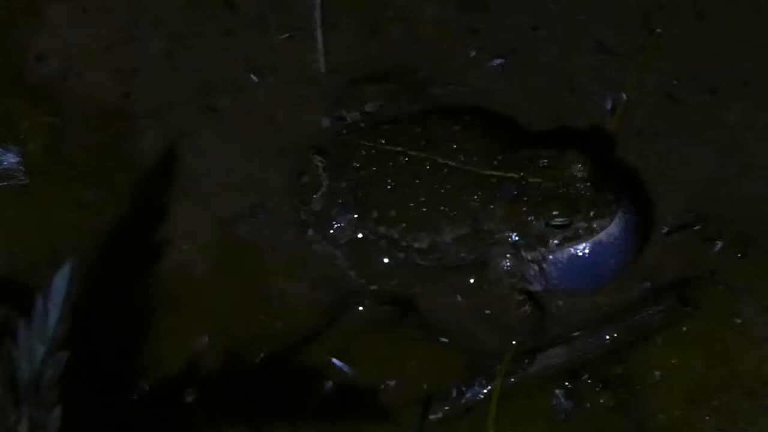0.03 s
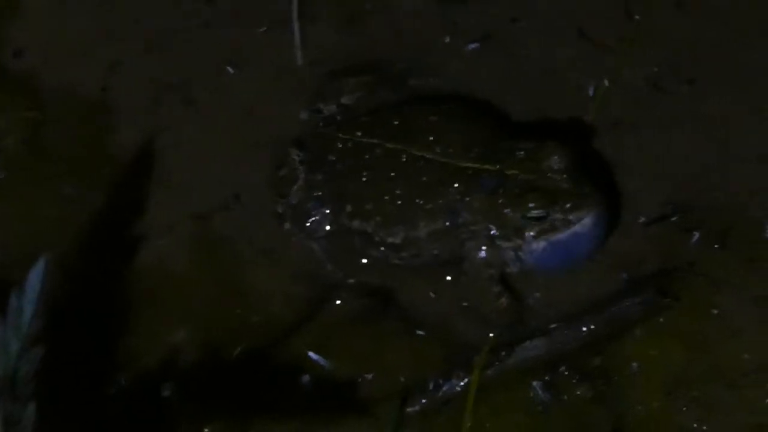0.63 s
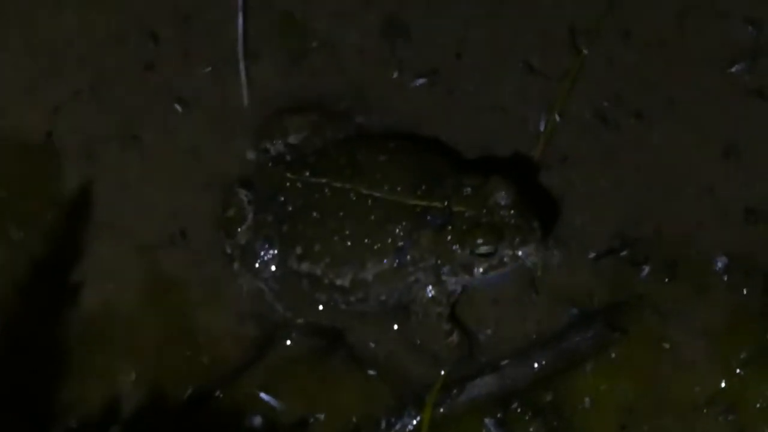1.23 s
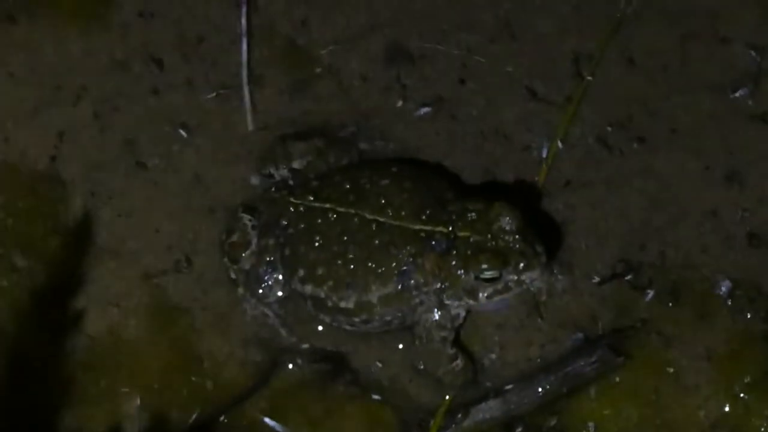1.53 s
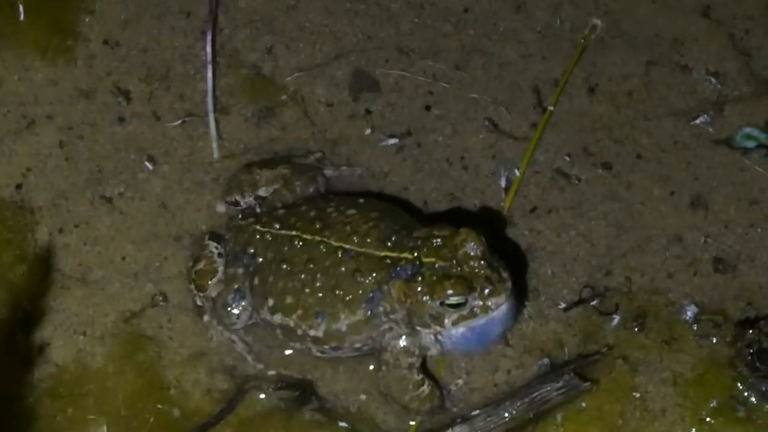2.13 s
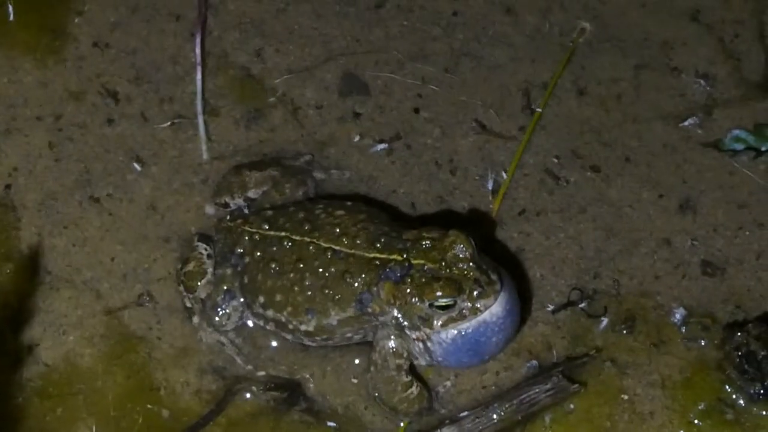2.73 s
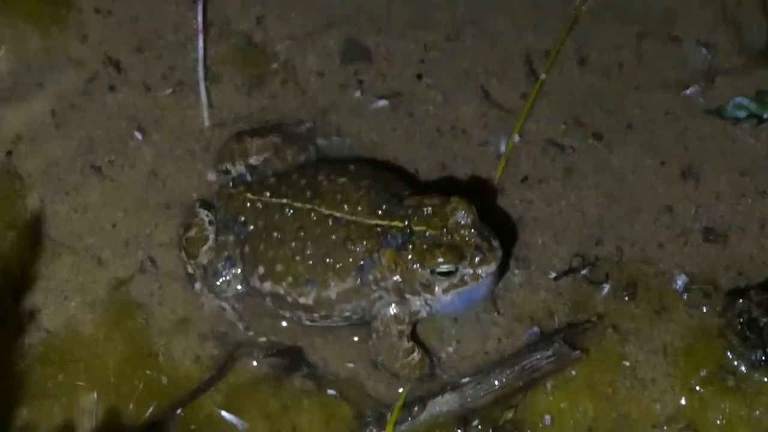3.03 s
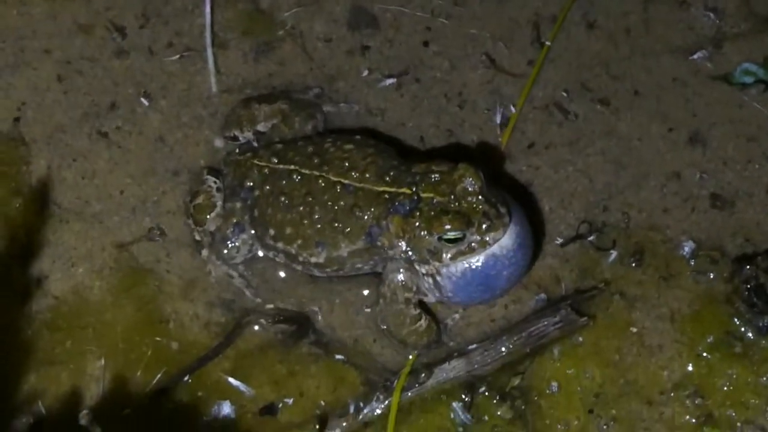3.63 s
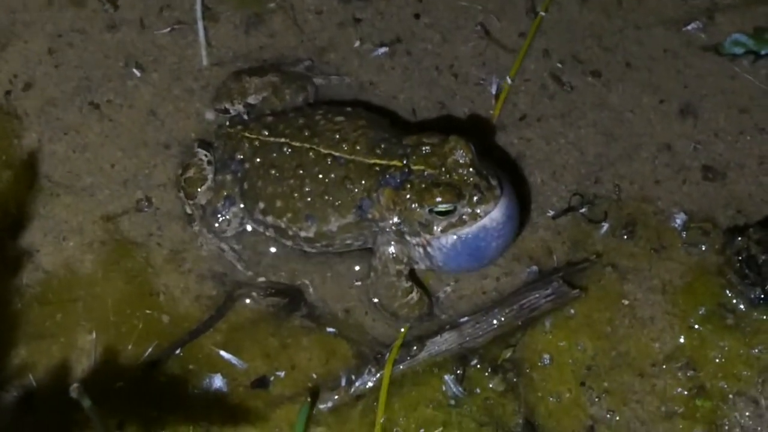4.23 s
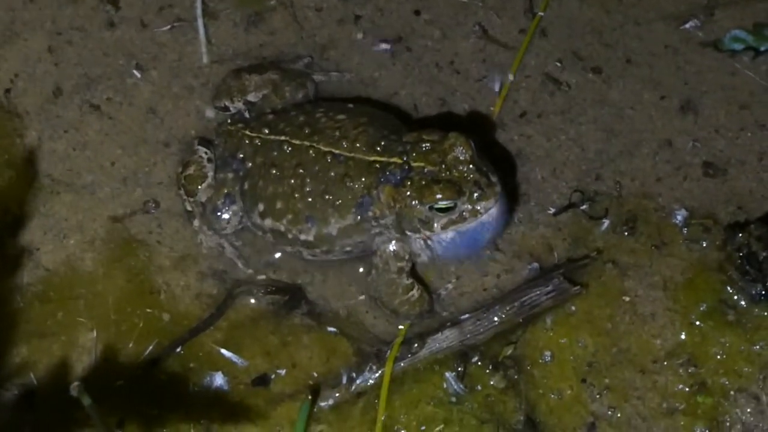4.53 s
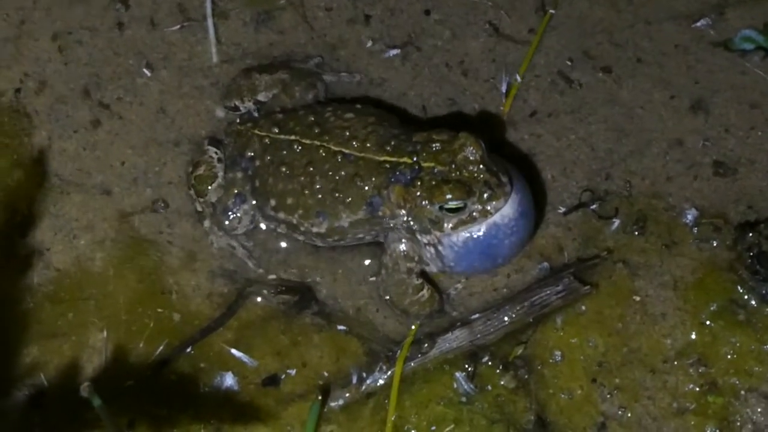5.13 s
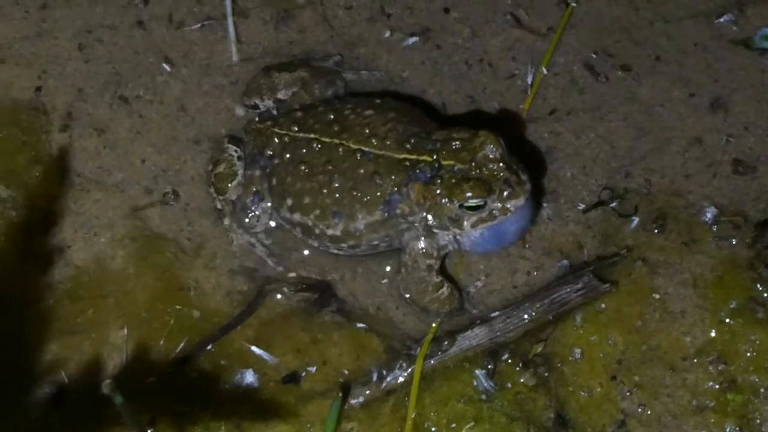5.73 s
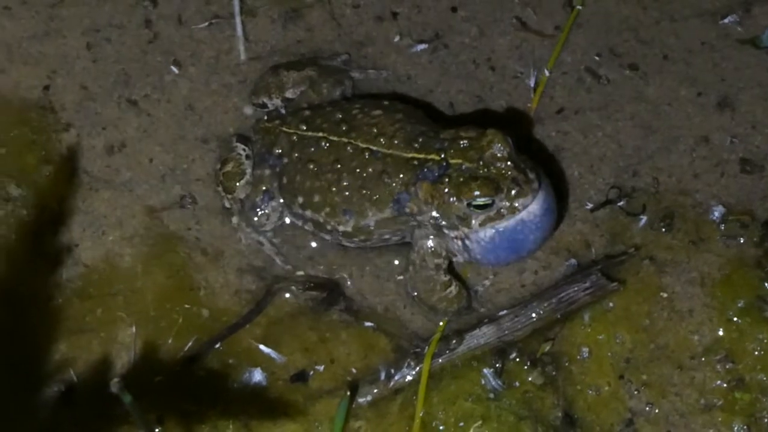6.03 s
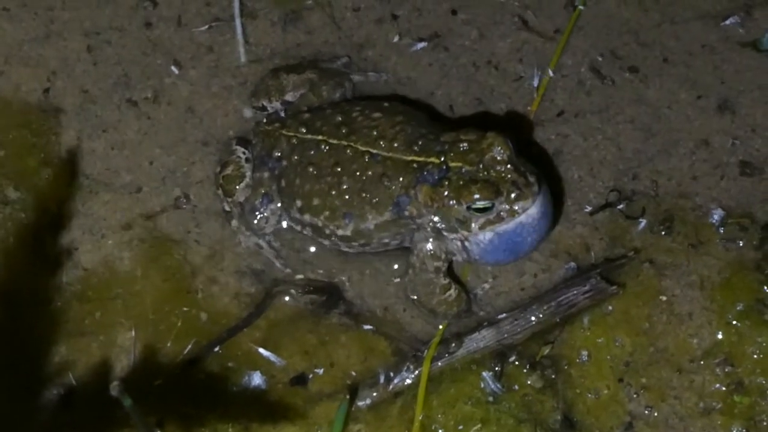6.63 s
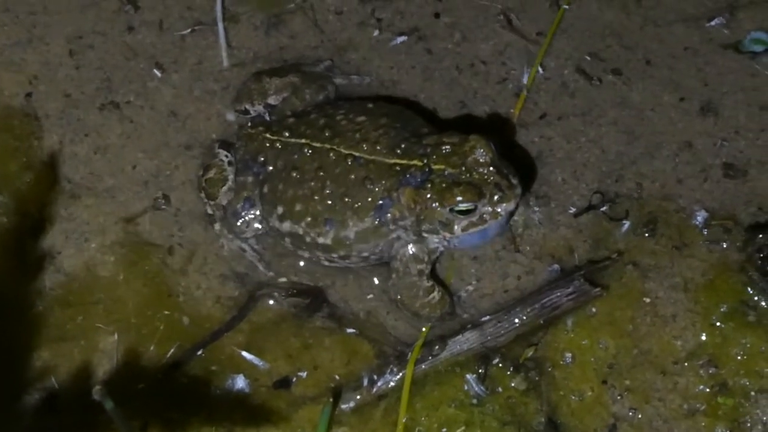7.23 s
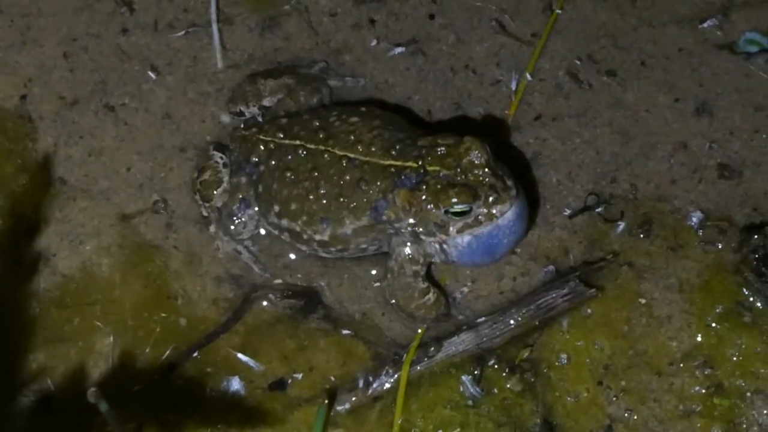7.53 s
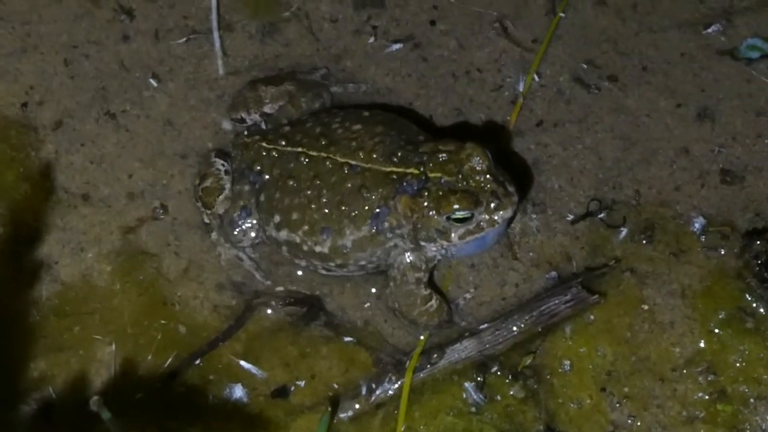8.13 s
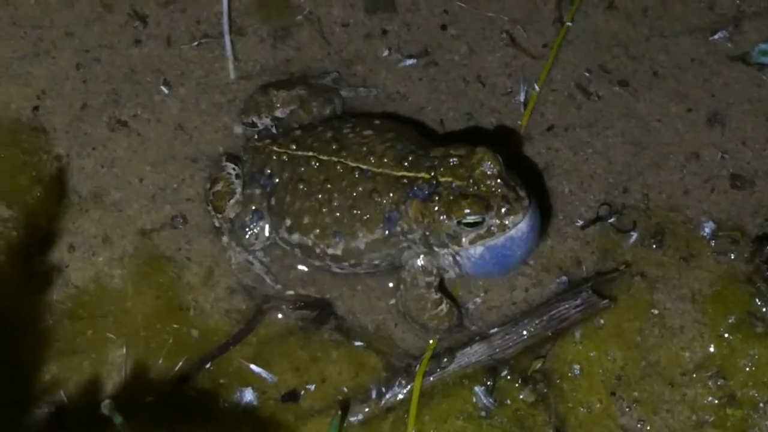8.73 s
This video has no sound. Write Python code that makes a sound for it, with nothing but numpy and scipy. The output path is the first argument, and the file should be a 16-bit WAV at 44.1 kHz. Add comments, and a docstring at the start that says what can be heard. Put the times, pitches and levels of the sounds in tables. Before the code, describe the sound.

Three toads call close to the microphone at the edge of a shallow pool at night. Their loud, rasping trills last about half a second each and follow one another in overlapping turns, each toad at a slightly different pitch. One sometimes ends on a tiny squeak. A fainter chorus of more toads continues farther away, over very soft night air. The calling carries on throughout.

```python
"""Toads at a night pool

Three toads trill in turns at the edge of a shallow pool, with a chorus of others farther off.
A trill is a run of pulses, 30-50 a second; each rings the vocal sac for a few milliseconds.
The middle toad sometimes ends on a squeak. Banks and plants scatter the calls. Behind them:
night air, a low distant hum, a few dry ticks and a small animal's faint chirps."""
import sys
import numpy as np
from scipy import signal
from scipy.fft import rfft, irfft, next_fast_len
from scipy.io import wavfile
from scipy.ndimage import uniform_filter1d, minimum_filter1d

SR = 44100
rng = np.random.default_rng(int(sys.argv[2]) if len(sys.argv) > 2 else 0)


def output_pcm(signal):
    """Save a mono or channel-first signal as 16-bit PCM at the path in sys.argv[1].

    Samples are clipped to [-1, 1] before scaling.
    """
    pcm = np.clip(np.atleast_2d(signal).T, -1, 1) * 32767
    wavfile.write(sys.argv[1], SR, np.round(pcm).astype(np.int16))


N = 391608
TIME_S = np.arange(N) / SR
PULSE_S = np.arange(int(.012 * SR)) / SR


def from_db(db):
    return 10 ** (np.asarray(db) / 20)


def unit_rms(x):
    return x / np.sqrt(np.mean(x ** 2) + 1e-20)


def pan(left_minus_right_db):
    return from_db([[left_minus_right_db / 2], [-left_minus_right_db / 2]])


def add(out, start_s, sound):
    """Mix in a sound if it starts within the track."""
    at = int(start_s * SR)
    if 0 <= at < N:
        out[:, at:at + sound.shape[-1]] += sound[..., :N - at]


def colour(x, spectrum):
    """Filter by a gain curve interpolated over log frequency."""
    hz, db = np.transpose(spectrum)
    size = next_fast_len(N)
    bins_hz = np.maximum(np.fft.rfftfreq(size, 1 / SR), 1)
    gain = from_db(np.interp(np.log(bins_hz), np.log(hz), db))
    return irfft(rfft(x, size) * gain, size)[..., :N]


def stereo_noise(side_db):
    """White noise, partly shared by both sides."""
    mid, side = rng.standard_normal((2, N))
    return mid + from_db(side_db) * side * [[1], [-1]]


# Air spectrum: f/Hz, relative density/dB
AIR_SPECTRUM = [(25, -15), (60, -15.5), (120, -2.5), (300, -1.5), (700, -6), (1100, 3), (2500, -2.5),
                (4500, -12.5), (6500, -22), (10000, -26), (13000, -32), (16000, -34.5)]


def night_air(rms_db):
    """Steady, wide noise with little treble."""
    return from_db(rms_db) * unit_rms(colour(stereo_noise(side_db=2.5), AIR_SPECTRUM))


# Hum envelope: t/s, relative level/dB
HUM_ENVELOPE = [(0.15, -75), (0.39, -55), (0.49, -72.5), (0.9, -61), (1.29, -69.5), (3.77, -69.5),
                (4.28, -64), (4.38, -82.5), (4.72, -65), (5.33, -81), (5.43, -59), (5.48, -74), (6.84, -70),
                (6.91, -87.5), (7.32, -60), (7.59, -83), (7.78, -67.5), (8.88, -69.5)]


def distant_hum(gain_db, hz, width_hz):
    """A wavering drone: noise through one narrow resonance."""
    radius = np.exp(-np.pi * width_hz / SR)
    feedback = [1, -2 * radius * np.cos(2 * np.pi * hz / SR), radius * radius]
    drone = signal.lfilter([1], feedback, stereo_noise(side_db=-4.5))
    running_rms = np.sqrt(uniform_filter1d(np.mean(drone ** 2, axis=0), size=8000) + 1e-12)
    return from_db(np.interp(TIME_S, *np.transpose(HUM_ENVELOPE)) + gain_db) * drone / running_rms


def trill(start_s, end_s, rate_hz, speedup, level_db, start_hz, manner, attack_s=0.12):
    """Pulse times, progress (0-1), levels, pitches. The pace sags mid-way; the filling sac tightens."""
    sag, swell_db, onset_cut_db, fill_power, full_hz = manner
    clock_s = np.arange(start_s, end_s, 1 / SR)
    ramp = (clock_s - start_s) / (end_s - start_s)
    pace_hz = rate_hz * (1 + sag * np.cos(2 * np.pi * ramp) + speedup * (ramp - .5))
    pulse_count = np.floor(np.cumsum(pace_hz) / SR)
    beats = np.flatnonzero(np.diff(pulse_count, prepend=-1))
    times_s, progress = clock_s[beats], ramp[beats]
    db = level_db + swell_db * (progress - .5) - onset_cut_db * np.exp((start_s - times_s) / attack_s)
    hz = full_hz - (full_hz - start_hz) * np.abs(1 - progress) ** fill_power
    return times_s, progress, db, hz


def pulse_envelope(peak_ms, sharpness):
    """Builds to 1, then dies away."""
    age = PULSE_S * 1000 / peak_ms
    return (age * np.exp(1 - age)) ** sharpness


# Rasp at each pulse onset: f/Hz, gain/dB
RASP_SPECTRUM = [(100, -16), (400, -10), (750, -11), (1050, 8), (2500, -9), (4500, -7), (6500, -24.5),
                 (10500, -31.5), (15000, -32.5)]


def toad(trills, manner, modes, gain_db, rasp_db, lag_ms, sharpness, lead_ms,
         jitter_ms=0.99, droop_hz=220, scatter_hz=40, sizzle_hz=130, wander_hz=60,
         uneven_db=1.4, shimmer_db=2.0, whistle_above_hz=7000):
    """Each pulse rasps and rings the sac (mode 0, pitched by the trill) and its overtones."""
    voice, rasp = np.zeros((2, 2, N))
    ear_s = PULSE_S - np.array([[0], [lag_ms]]) / 1000
    # overtones start high and fall within each pulse
    droop_cycles = np.cumsum(droop_hz * (np.exp(-PULSE_S / .002) - 1 / np.e)) / SR
    for row in trills:
        times_s, progress, levels_db, pitches_hz = trill(*row, manner)
        centred = progress - .5
        shimmer, detune, jitter = rng.standard_normal((len(times_s), 3)).T
        pulses = 0
        for k, (hz, db, peak_ms, glide_oct, growth_db, pan_db) in enumerate(modes):
            scatter, uneven, start_cycles, steps = rng.standard_normal((len(times_s), 4)).T
            overtone = k > 0
            if hz > whistle_above_hz:   # thin whistles wander and reach both sides together
                walk = np.cumsum(steps)
                stray_hz = sizzle_hz * scatter + wander_hz * (walk - walk.mean())
                age_s = PULSE_S
            else:
                stray_hz = scatter_hz * scatter
                age_s = ear_s
            if overtone:
                pitch_hz = hz * 2 ** (glide_oct * rng.uniform(1.0, 1.9) * centred) + stray_hz
            else:
                pitch_hz = pitches_hz * (1 + .012 * detune)
            cycles = pitch_hz[:, None, None] * age_s + start_cycles[:, None, None]
            ring = pulse_envelope(peak_ms, sharpness) * np.sin(2 * np.pi * (cycles + overtone * droop_cycles))
            strength = from_db(db + growth_db * centred + overtone * uneven_db * uneven)
            pulses = pulses + strength[:, None, None] * pan(pan_db) * ring
        onsets_s = times_s + (jitter_ms * jitter - lead_ms) / 1000
        gains = from_db(gain_db + levels_db + shimmer_db * shimmer)
        for onset_s, gain, pulse in zip(onsets_s, gains, pulses):
            add(voice, onset_s, gain * pulse)
            rasp_gain = gain * from_db(rasp_db + uneven_db * rng.standard_normal())
            burst = pulse_envelope(peak_ms=1.0, sharpness=0.81) * rng.standard_normal(len(PULSE_S))
            add(rasp, onset_s, rasp_gain * burst)
    sac_pan_db = modes[0][-1]
    return voice + colour(rasp[0], RASP_SPECTRUM) * pan(sac_pan_db)


# Calling manner: pace sag/ratio, swell/dB, onset cut/dB, sac fill exponent (1 = even), full-sac f/Hz
FAR_MANNER = (.03, 1.7, 1.1, 1.4, 1687)
# Sac, then overtones: f/Hz, relative level/dB, rise/ms, nominal glide/oct, growth/dB, L-R/dB
FAR_MODES = [(1640, 2.5, 2.22, 0, 0.0058, 0.0041), (2410, -28.5, 2.3, 0.04, 0.0011, 0.0052),
             (3337, -23, 1.8, 0.26, 0.005, 0.01), (4350, -39, 4.6, -0.011, 0.0041, 0.0036),
             (8900, -53, 2.3, -0.24, 0.00078, 0.0063)]
# Chorus lulls: centre t/s, half-width/s, depth/dB
LULLS = [(1.297, 0.083, 6), (4.308, 0.058, 5), (6.344, 0.051, 3.5), (7.081, 0.081, 10.5)]


def far_chorus(gain_db, spread_hz, rise_hz, count):
    """Farther toads at different pitches, near the centre, their pace varying from trill to trill."""
    out = 0
    for pitch_offset in np.linspace(-1, 1, count):
        starts_s = np.arange(-rng.uniform(0, .7), N / SR, .75)
        full_hz = FAR_MANNER[-1] + spread_hz * pitch_offset
        slack_hz = full_hz - rise_hz
        side = np.cos(5 * pitch_offset)
        trills = [(s, s + rng.uniform(.5, .65), rng.normal(45, 3), 0, 0, slack_hz) for s in starts_s]
        voice = toad(trills, (*FAR_MANNER[:-1], full_hz), FAR_MODES, gain_db,
                     rasp_db=-42.0, lag_ms=0.04 * side, sharpness=2.25, lead_ms=0)
        out = out + voice * pan(4 * side)
    dip_db = sum(db * np.exp(-((TIME_S - s) / half_s) ** 2) for s, half_s, db in LULLS)
    return out * from_db(-dip_db)


def bank_scatter(x, echo_db, t60_s):
    """Mud banks and plants scatter a short tail, different on each side."""
    age_s = np.arange(int(.3 * SR)) / SR
    tail = rng.standard_normal((2, len(age_s))) * from_db(-60 * age_s / t60_s) * (age_s > .003)
    tail /= np.sqrt(np.sum(tail ** 2, axis=1, keepdims=True))
    return from_db(echo_db) * signal.fftconvolve(x.mean(axis=0)[None], tail, axes=1)[:, :N]


# Trills: start t/s, end t/s, pulse rate/Hz, speed-up/ratio, relative level/dB, starting sac f/Hz
LEFT_TRILLS = [(0.134, 0.611, 43.8, -0.1, -14.5, 1840), (0.871, 1.224, 43.7, 0.0, -15.5, 1845),
               (1.409, 1.783, 44, 0.12, -16.5, 1884), (2.029, 2.436, 41.3, 0.2, -15.5, 1885),
               (2.668, 3.157, 33.8, 0.0, -16, 1865), (3.352, 3.709, 39.6, -0.1, -16, 1895),
               (3.894, 4.292, 42.4, 0.15, -16.5, 1875), (4.484, 4.947, 39.7, 0.05, -17, 1870),
               (5.201, 5.727, 34.8, -0.15, -16.5, 1851), (5.894, 6.377, 34.5, 0.15, -17, 1880),
               (6.555, 6.972, 39.3, -0.2, -17.5, 1844), (7.177, 7.551, 41.2, 0.05, -18, 1867),
               (7.799, 8.27, 37.5, 0.1, -16.5, 1862), (8.504, 8.862, 38.7, 0.0, -16.5, 1871)]
# Manner and modes: columns as FAR_MANNER, FAR_MODES
LEFT_MANNER = (0.23, -1.5, -0.5, 1.26, 1994)
LEFT_MODES = [(1920, -1.5, 2.1, 0, 0, 5), (2340, -30.5, 2.1, 0.069, 5, 5), (3120, -34, 1.5, 0.01, -1, 3),
              (3853, -36, 2.5, 0.08, -1.5, 2), (4530, -44.5, 4.8, 0.084, 0.5, -0.5),
              (8300, -61.5, 2, -.08, -7, -6.5), (10300, -52.5, 2.3, -0.13, 22, 3)]


def left_toad():
    """The highest sac; its pace sags most."""
    return toad(LEFT_TRILLS, LEFT_MANNER, LEFT_MODES,
                gain_db=6.0, rasp_db=-27.5, lag_ms=0.05, sharpness=2.54, lead_ms=2.5)


# Trills, manner, modes: columns as for the left toad
MIDDLE_TRILLS = [(0.151, 0.234, 43.9, 0.0, -15.5, 1662), (0.491, 0.721, 30.84, -0.29, -15, 1640),
                 (1.574, 2.096, 41.26, -0.14, -19, 1540), (2.325, 2.928, 46.25, 0.19, -19.5, 1543),
                 (3.2, 3.739, 46.3, -0.12, -17.5, 1580), (3.946, 4.486, 39.67, -0.3, -17, 1555),
                 (4.731, 5.227, 45.25, 0.1, -17.5, 1545), (5.668, 6.19, 45.9, -0.2, -18.5, 1498),
                 (6.4, 6.845, 39.75, -0.19, -18, 1523), (7.3, 7.821, 40.56, 0.033, -17, 1550),
                 (8.199, 8.68, 41.38, -0.33, -18.5, 1483)]
MIDDLE_MANNER = (.05, .5, 1, 1.5, 1750)
MIDDLE_MODES = [(1670, -3, 2.32, 0, 3, -3.5), (2450, -32.5, 1.3, -0.044, -2, 2),
                (3155, -24.5, 0.88, 0.036, 0.5, -3), (4664, -30, 1.5, 0.06, -2, -0.5),
                (5420, -47, 1.2, 0.031, -7.5, 1), (8200, -65, 2.1, -.08, -6, -2),
                (10060, -55.5, 3.2, -0.04, 20, -2), (11340, -58.5, 4.6, -0.12, -4, -1.5),
                (13200, -67.5, 1.3, 0, 5, -2), (15000, -69.5, 1.1, 0, 3.5, -4.5)]


def middle_toad():
    """The lowest near sac; its pitch climbs farthest."""
    return toad(MIDDLE_TRILLS, MIDDLE_MANNER, MIDDLE_MODES,
                gain_db=7.5, rasp_db=-33, lag_ms=-0.0072, sharpness=1.98, lead_ms=2.09)


def arched_notes(notes, harmonics_db, arch):
    """Short wavering notes whose pitch and level rise and fall once."""
    out = np.zeros((2, N))
    for start_s, length_s, top_hz, db in notes:
        bow = np.sin(np.linspace(0, np.pi, int(length_s * SR)))
        waver = unit_rms(uniform_filter1d(rng.standard_normal(len(bow)), size=60))
        pitch_hz = top_hz * (1 - arch * (1 - bow) + 0.037 * waver)
        phase = 2 * np.pi * np.cumsum(pitch_hz) / SR
        note = sum(from_db(level) * np.sin(k * phase) for k, level in enumerate(harmonics_db, 1))
        add(out, start_s, from_db(db) * bow * note)
    return out


# Squeaks: t/s, length/s, top f/Hz, level/dB
SQUEAKS = [(.226, 0.014, 1634, -19), (.776, 0.034, 1548, -18.5), (2.070, 0.035, 1594, -21),
           (2.912, 0.019, 1586, -25.5), (3.725, 0.022, 1610, -30), (5.217, 0.012, 1690, -25),
           (6.825, 0.029, 1623, -22.5)]
# Harmonics 1-3: relative level/dB
SQUEAK_HARMONICS_DB = [0, -20, -24.5]


def squeaks():
    """The middle toad's last pulse sometimes runs on into a squeak."""
    return arched_notes(SQUEAKS, SQUEAK_HARMONICS_DB, arch=0.039)


# Trills, manner, modes: columns as for the left toad
RIGHT_TRILLS = [(0.245, 0.783, 51.33, -0.15, -12, 1720), (0.953, 1.378, 43.87, -0.21, -12, 1720),
                (1.567, 2.019, 46.35, 0.14, -14.5, 1770), (2.241, 2.639, 43.68, 0.17, -13, 1700),
                (2.852, 3.376, 42.3, 0.078, -14.5, 1692), (3.619, 4.17, 49.02, 0.12, -16, 1697),
                (4.396, 4.91, 42.7, 0.067, -15, 1720), (5.095, 5.591, 49.3, -0.19, -15.5, 1706),
                (5.767, 6.307, 45.42, 0.1, -18.5, 1730), (6.401, 6.763, 44.74, -0.25, -14.5, 1695),
                (6.967, 7.456, 42.15, 0.11, -15, 1703), (7.656, 8.196, 43.56, -0.083, -14.5, 1714),
                (8.368, 8.795, 49.76, -0.27, -15.5, 1679)]
RIGHT_MANNER = (0.16, 0.5, -0.5, 0.9, 1775)
RIGHT_MODES = [(1720, -2.5, 2.04, 0, -0.5, -7.5), (2180, -23.5, 1.4, 0, -1.5, -5),
               (2437, -23.5, 1.3, 0.028, 4, -7), (3412, -23.5, 1.92, -0.044, 8, -5),
               (4040, -44, 3.7, 0.037, -2.5, -6), (8360, -65, 2.8, -.07, -0.5, -1),
               (9800, -60.5, 2.1, -.06, 3.5, -3.5)]


def right_toad():
    """The fastest near toad; its sac pitch barely climbs."""
    return toad(RIGHT_TRILLS, RIGHT_MANNER, RIGHT_MODES,
                gain_db=4.0, rasp_db=-27.5, lag_ms=-0.012, sharpness=2.63, lead_ms=1.828)


# Ticks: t/s, level before low-pass/dB, decay/ms
TICKS = [(2.852, -43, 0.57), (5.425, -17, 0.13), (7.184, -60, 1)]


def ticks():
    """Single dry, noisy impulses, dull at the top."""
    out = np.zeros((2, N))
    for start_s, db, decay_ms in TICKS:
        decay = np.exp(-PULSE_S * 1000 / decay_ms)
        grain = 1 + .5 * rng.standard_normal((2, len(decay)))
        add(out, start_s, from_db(db) * decay * grain)
    return signal.lfilter([.5], [1, -.5], out + 1e-18)


# Chirps: t/s, length/s, top f/Hz, level/dB
CHIRPS = [(8.408, 0.039, 4220, -44), (8.535, 0.054, 4400, -44.5), (8.675, 0.037, 4010, -44)]


def chirps():
    """A small animal chirps faintly: steeply arched sine notes."""
    return arched_notes(CHIRPS, harmonics_db=[0], arch=0.25)


def scene():
    """Three near toads, the far chorus and the quiet night behind them."""
    near = left_toad() + right_toad() + middle_toad() + squeaks()
    far = far_chorus(gain_db=-22.0, spread_hz=119.0, rise_hz=57, count=4)
    # distant calls carry much more scatter
    near += bank_scatter(near, echo_db=-14, t60_s=0.073)
    far += bank_scatter(far, echo_db=-5.5, t60_s=0.056)
    air = night_air(rms_db=-51.5)
    return near + far + air + chirps() + ticks() + distant_hum(gain_db=2, hz=141.1, width_hz=4.3)


def limiter(x, ceiling_db, hold_ms):
    """Where loud pulses fall together, the gain dips briefly."""
    size = int(hold_ms * SR / 1000)
    gain = np.minimum(1, from_db(ceiling_db) / (np.abs(x).max(axis=0) + 1e-9))
    held = minimum_filter1d(gain, 2 * size + 1)
    return x * uniform_filter1d(uniform_filter1d(held, size), size)


def record(dry):
    """Short opening silence, peak limiting, steep low-pass."""
    start_s, fade_s, stopband_hz = .131, 0.0017, 16800
    gate = np.clip((TIME_S - start_s) / fade_s, 0, 1)
    lowpass = signal.cheby2(12, 70, stopband_hz, fs=SR, output="sos")
    return signal.sosfilt(lowpass, gate * limiter(dry, ceiling_db=-4.5, hold_ms=2.0))


dry = scene()
out = record(dry)
output_pcm(out)
```